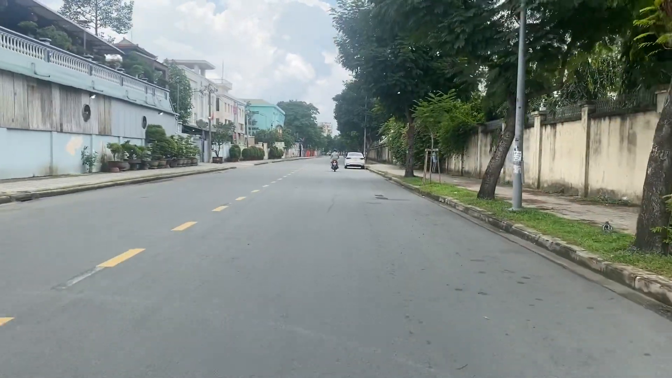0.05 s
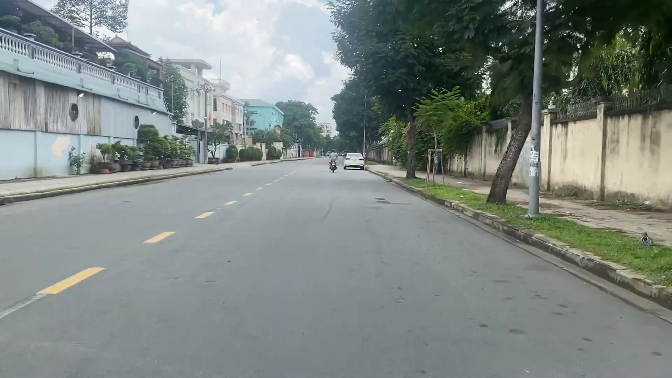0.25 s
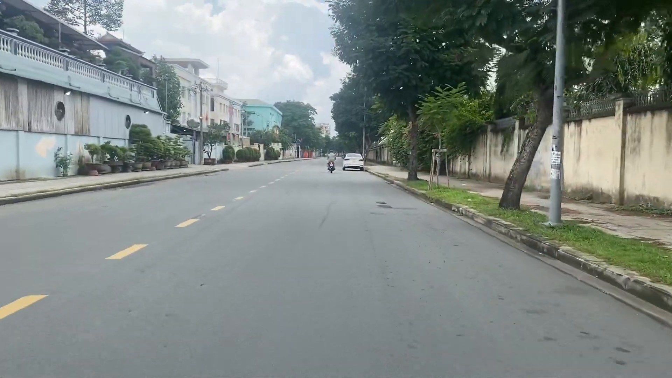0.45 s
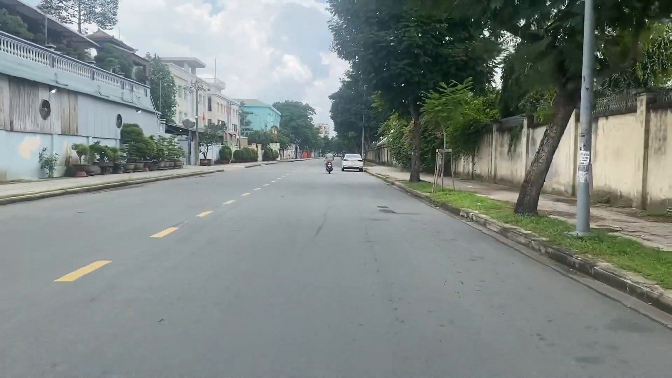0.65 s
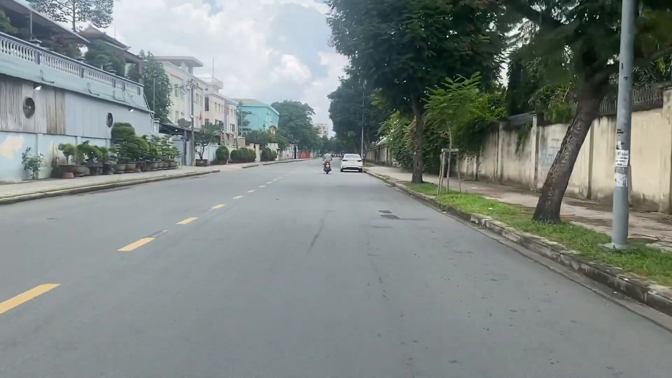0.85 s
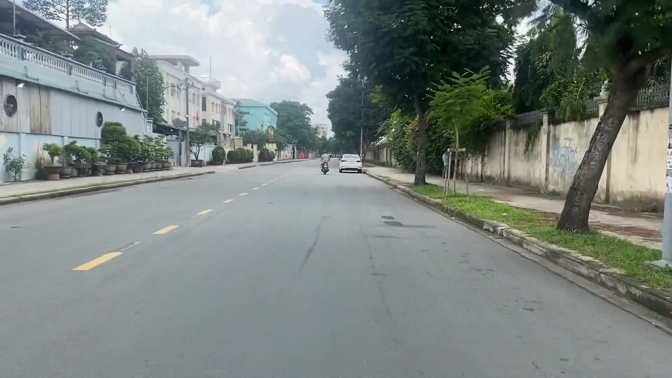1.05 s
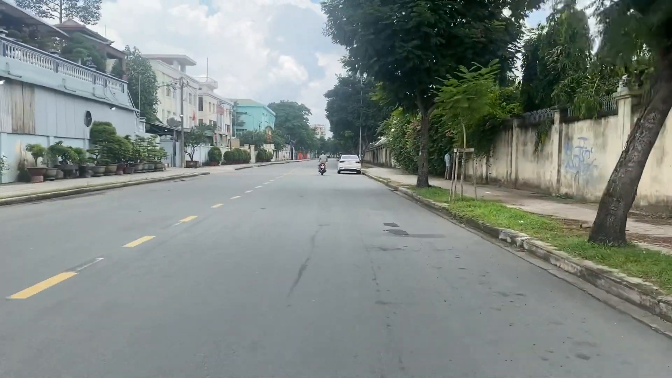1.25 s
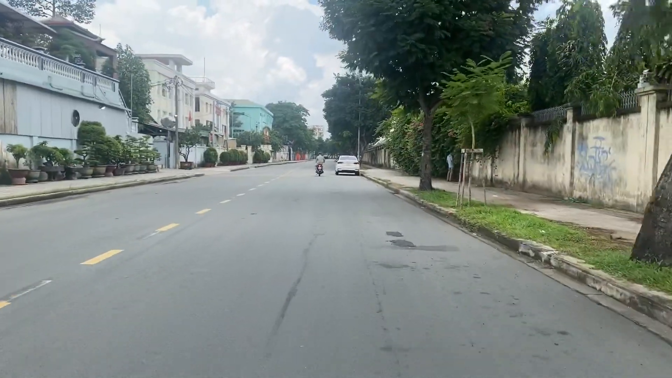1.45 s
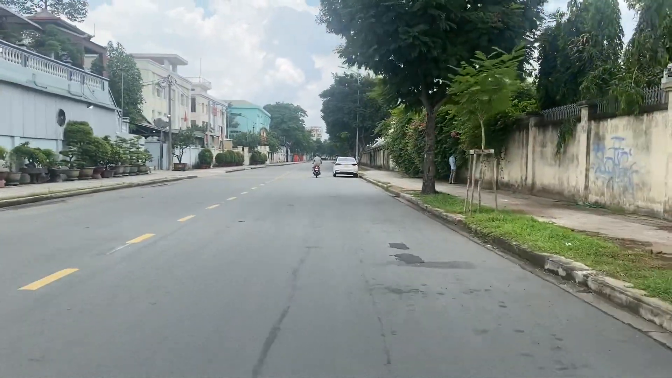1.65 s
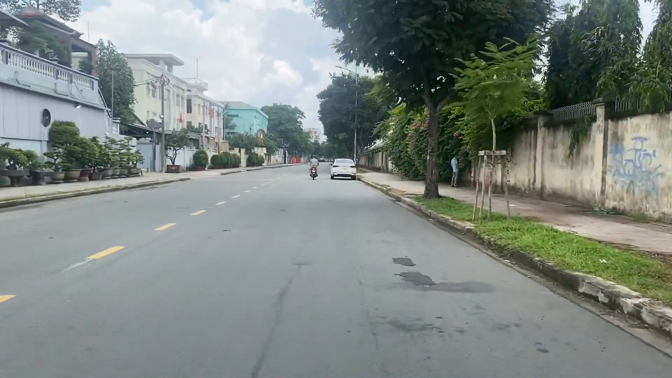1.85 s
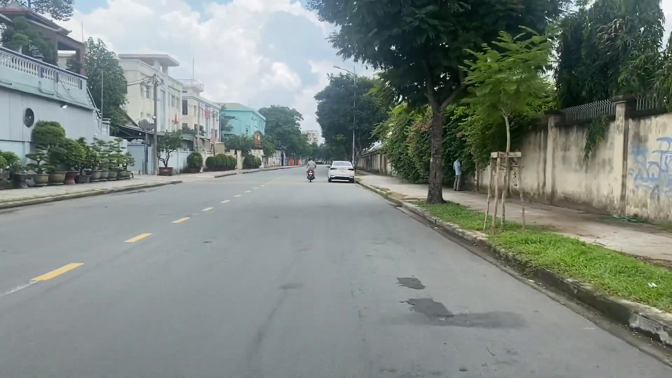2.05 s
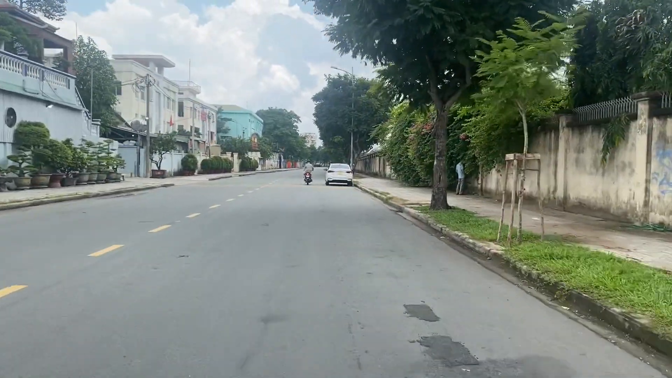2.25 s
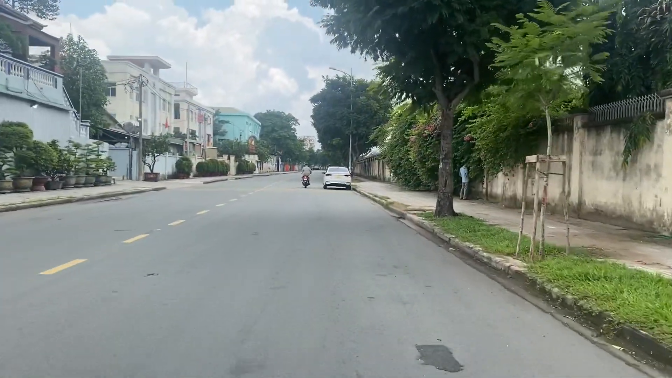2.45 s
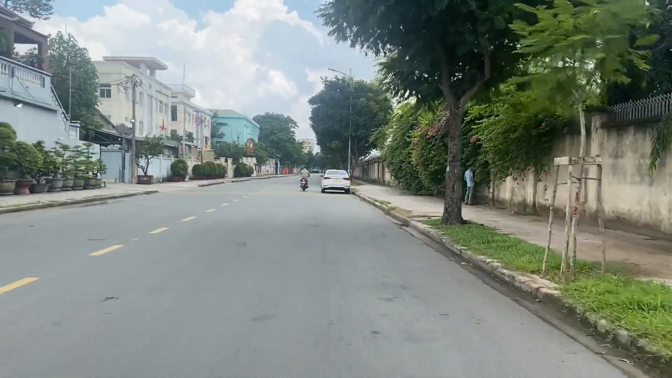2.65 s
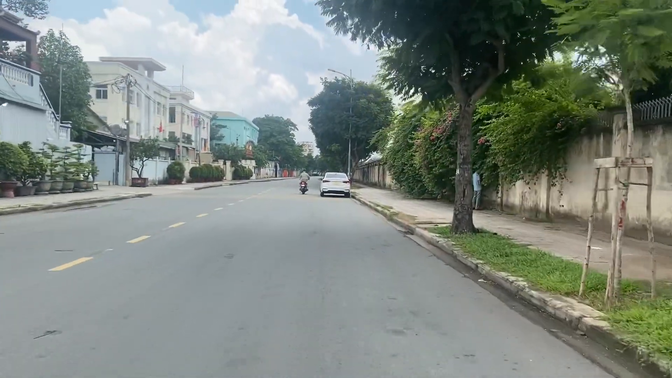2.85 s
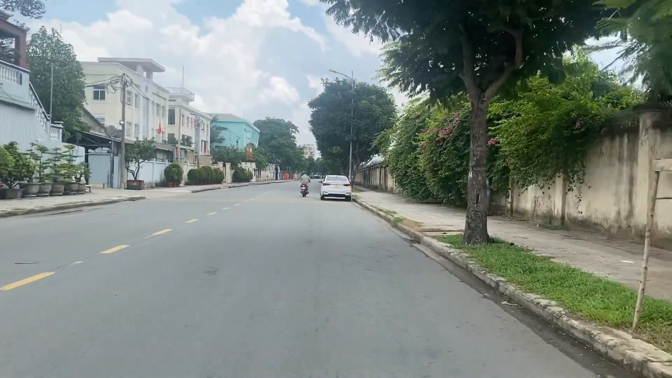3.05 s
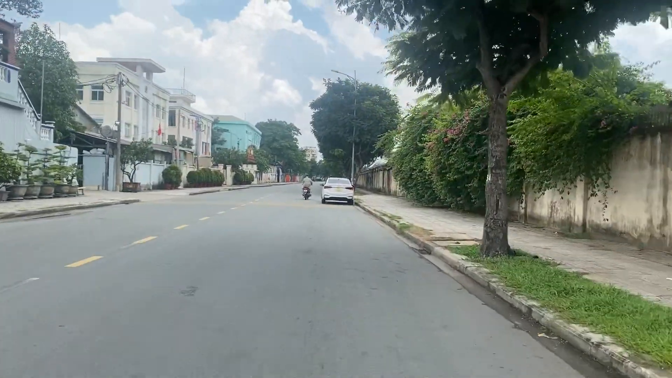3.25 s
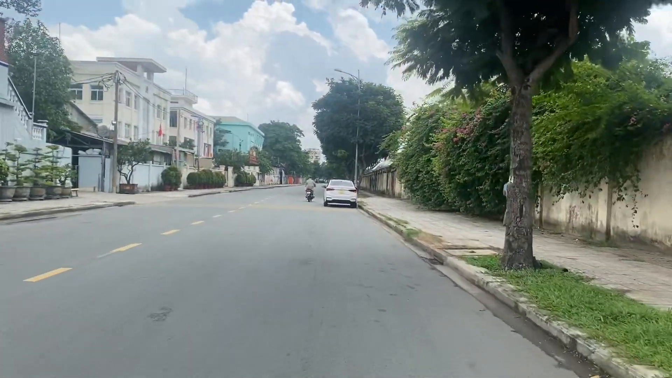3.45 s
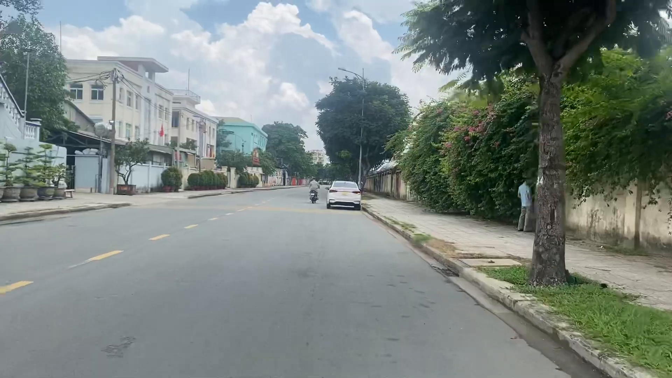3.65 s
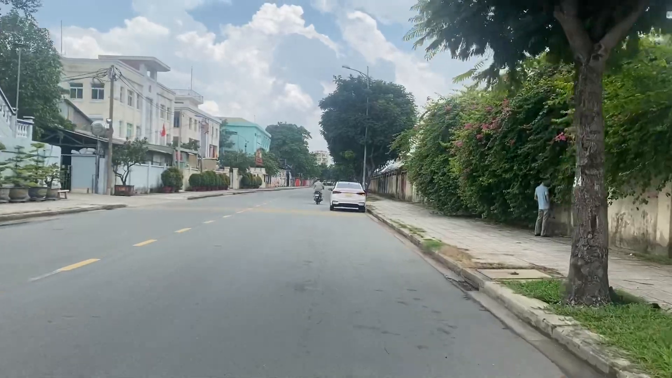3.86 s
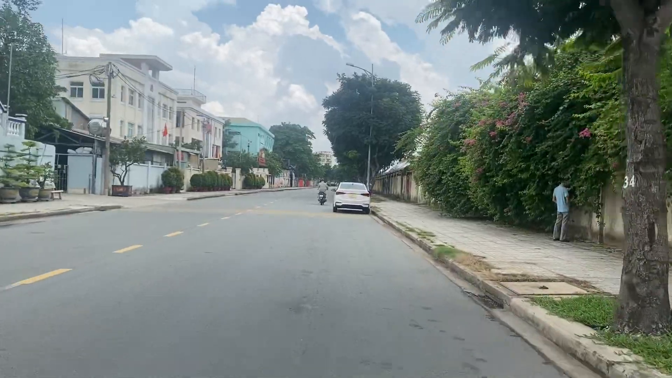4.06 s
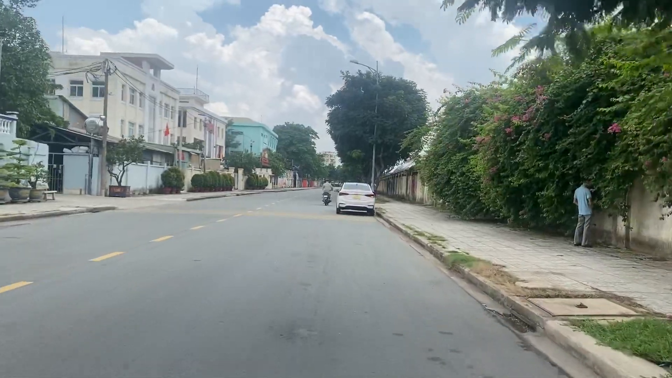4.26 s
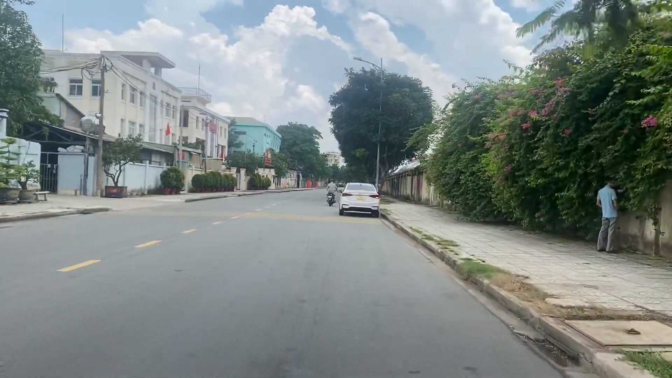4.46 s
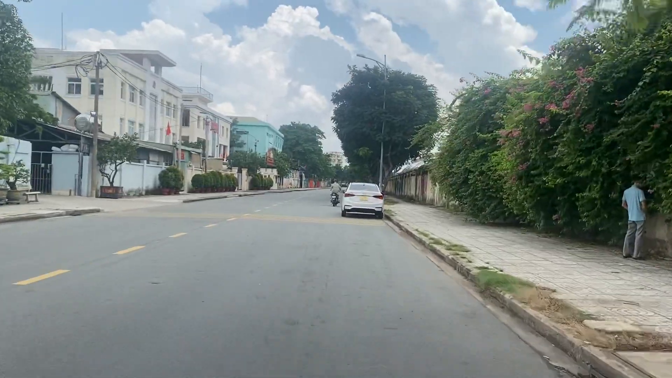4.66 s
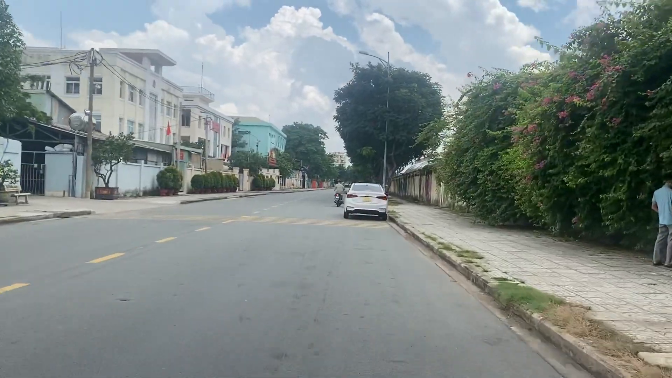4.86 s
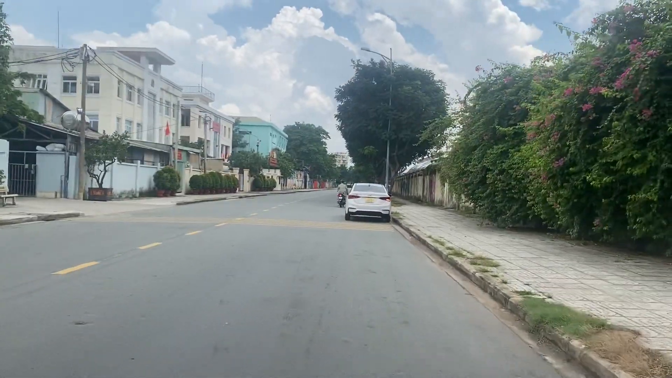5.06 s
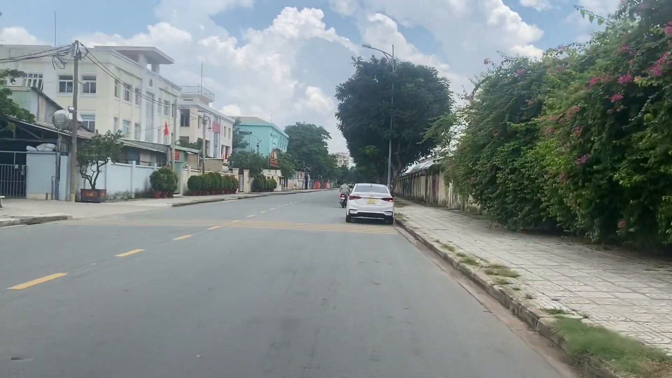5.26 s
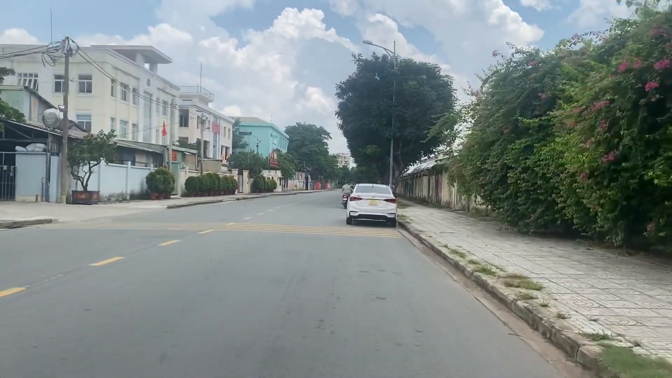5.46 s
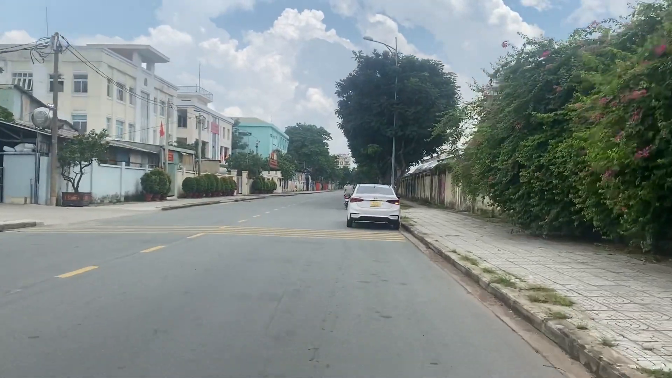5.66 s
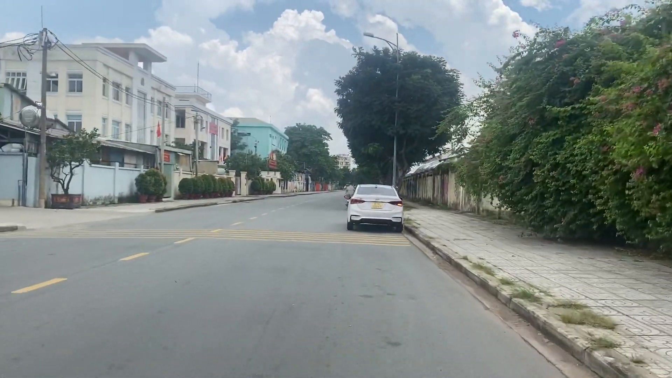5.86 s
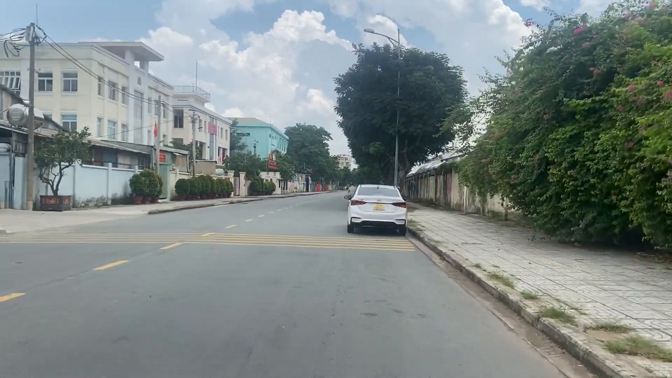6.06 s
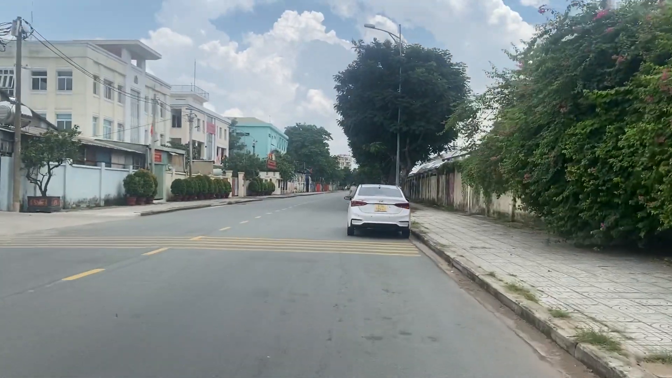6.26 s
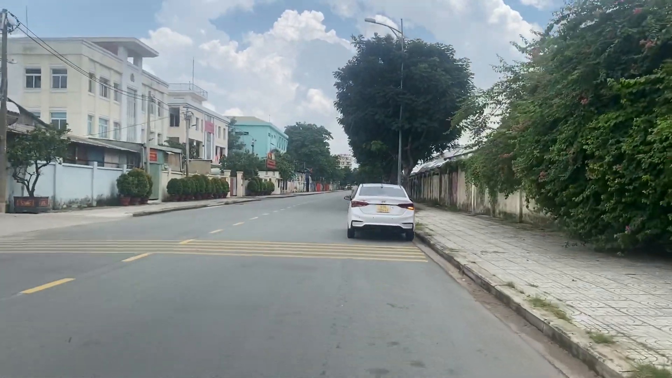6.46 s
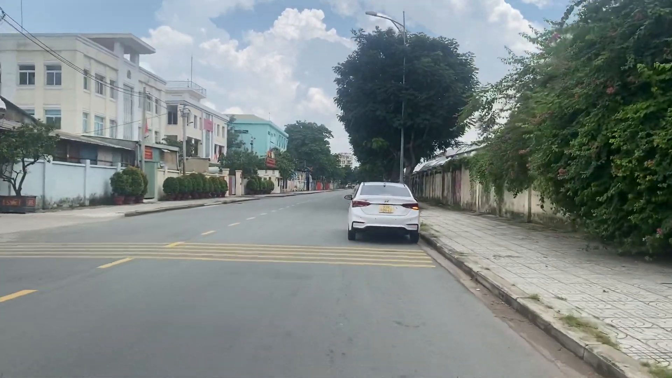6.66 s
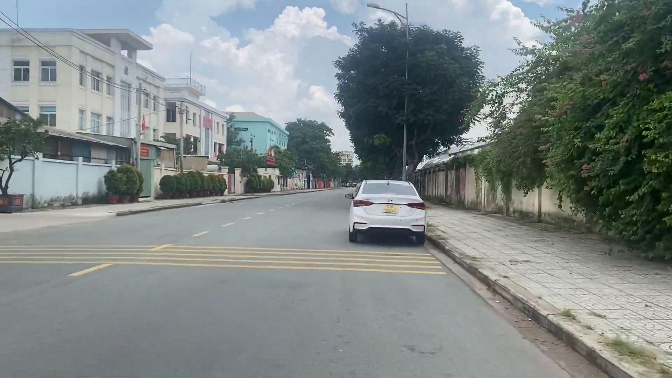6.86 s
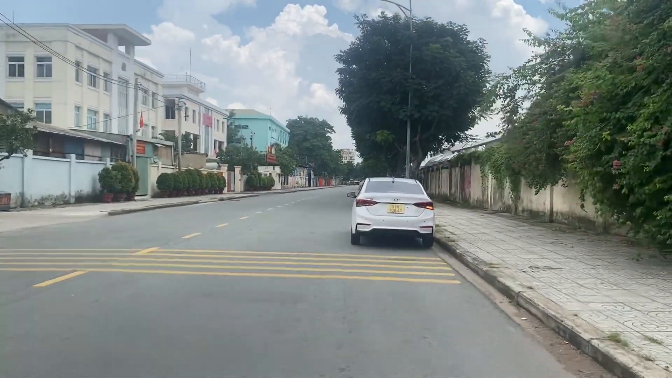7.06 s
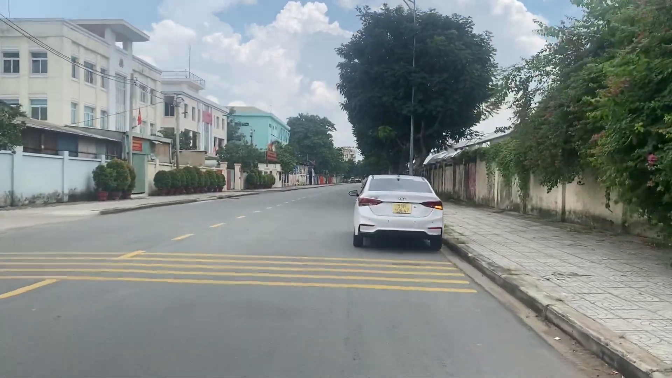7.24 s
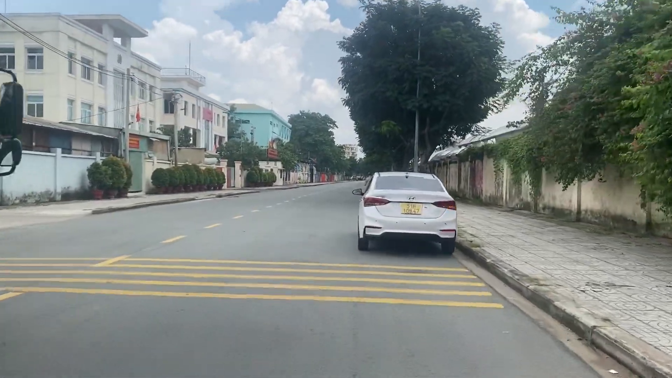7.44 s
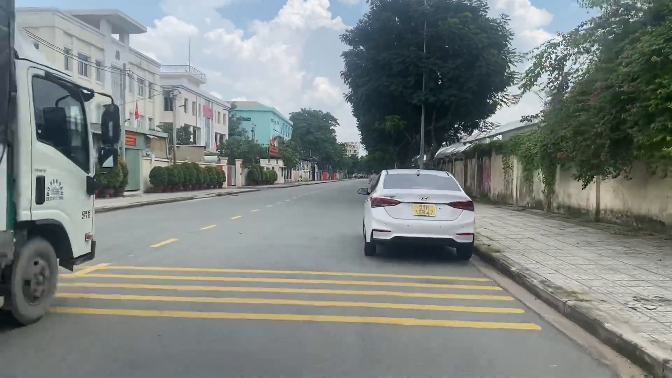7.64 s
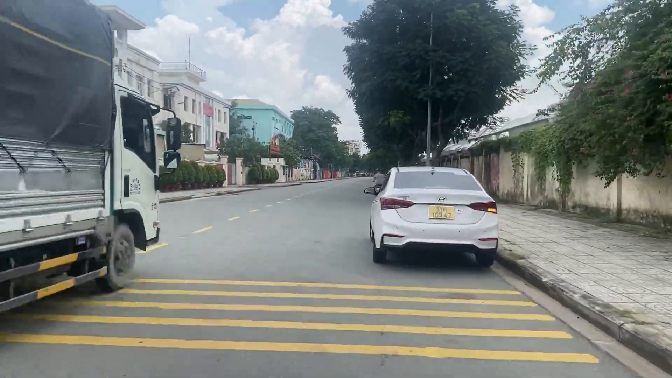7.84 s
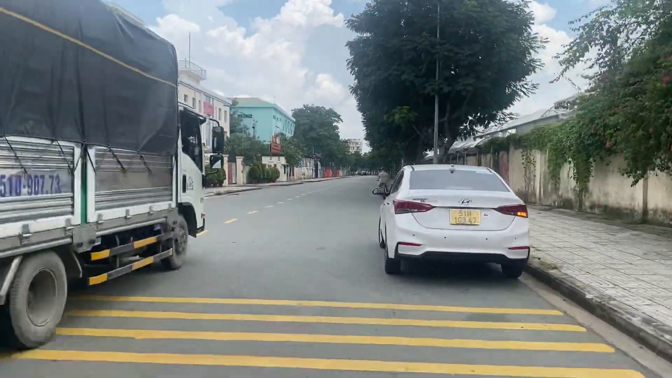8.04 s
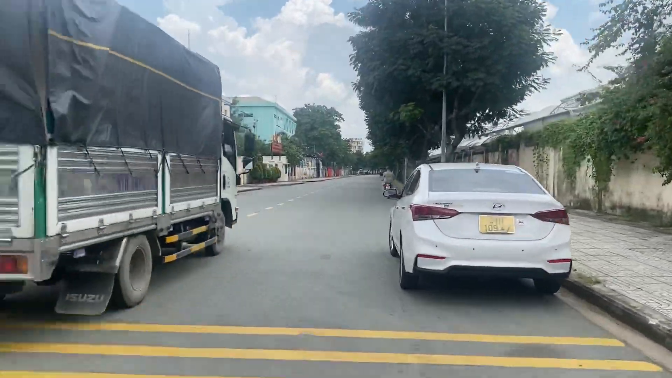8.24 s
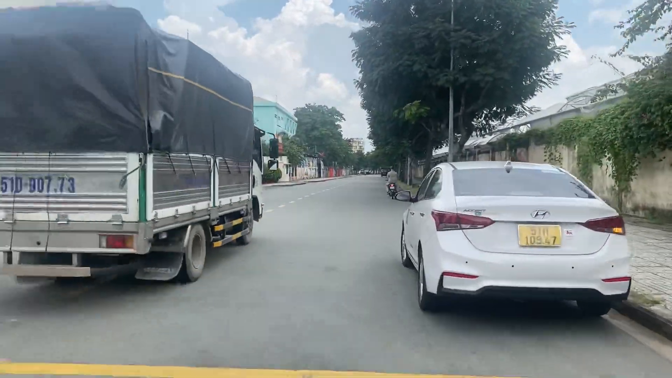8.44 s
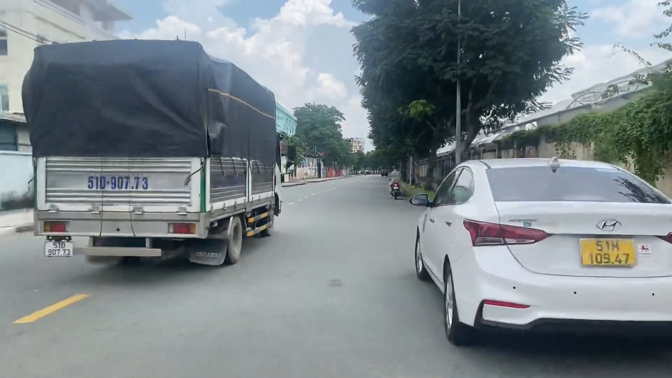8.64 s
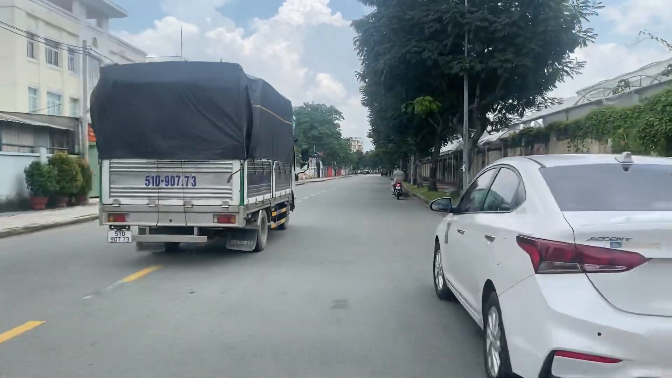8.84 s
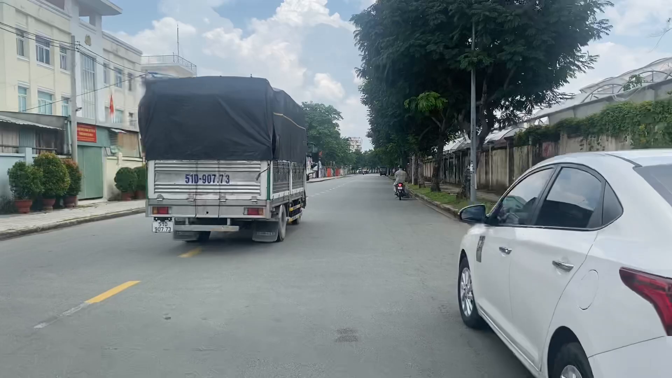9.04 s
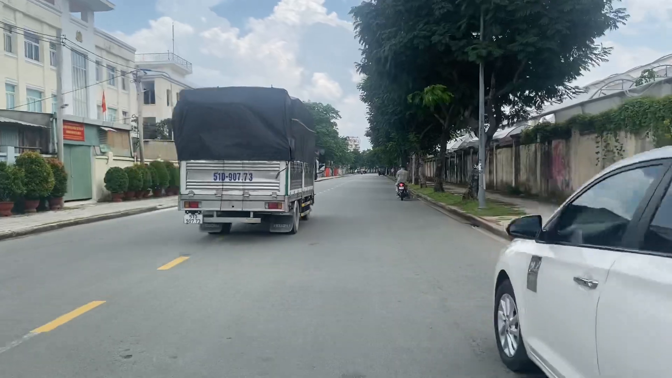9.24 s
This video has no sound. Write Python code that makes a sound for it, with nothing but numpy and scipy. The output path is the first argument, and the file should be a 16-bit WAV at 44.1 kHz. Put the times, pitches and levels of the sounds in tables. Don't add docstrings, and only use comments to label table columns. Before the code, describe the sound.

On a slow scooter along a quiet street, steady tyre roar and a small uneven engine run beneath wind bumping straight on the microphone. Faint panel ticks come and go. Midway a diesel hum grows, then a truck hisses and roars past on the left, loudest after seven seconds, and recedes ahead amid heavy wind slaps.

```python
import sys
import numpy as np
from scipy import signal
from scipy.fft import rfft, irfft, next_fast_len
from scipy.io import wavfile
from scipy.ndimage import uniform_filter1d

SR = 44100
rng = np.random.default_rng(int(sys.argv[2]) if len(sys.argv) > 2 else 0)


def wav_record(signal):
    frames = np.transpose(np.atleast_2d(signal))
    bounded = np.clip(frames, -1, 1)
    quanta = np.round(bounded * 32767).astype(np.int16)
    wavfile.write(sys.argv[1], SR, quanta)


def linear_from_db(decibels):
    return 10 ** (np.asarray(decibels, float) / 20)


N = 410123
TIME = np.arange(N) / SR

# (frequency [Hz], likeness [0-1], lead of left [rad])
STREET_PAIR = [(60, 0.17, 0.8), (345, 0.7, -0.46), (780, 0.22, 3), (2470, 0, -1.5), (4400, 0.9, -1),
               (5000, 0.44, -2), (6100, 0.53, -1.5), (7360, 0.14, 5)]
# (frequency [Hz], likeness [0-1], lead of left [rad])
TREBLE_PAIR = [(8100, .6, 2.3), (8350, .89, 3.14), (8900, .92, 3.14), (9450, .86, 3.14), (9900, .6, 4.7),
               (10450, 1, 6.28), (11700, 1, 6.28), (12200, .7, 7.4), (12800, .99, 9.42), (13600, 1, 9.42),
               (14200, .97, 9.42), (14700, .4, 11), (15100, 1, 12.57)]
# (time [s], strength [dB])
HEADWIND = [(0, -30.5), (.9, -39), (1.6, -34), (2.4, -38), (3.3, -39), (4.1, -36), (4.9, -41), (5.6, -34),
            (6.2, -31), (6.7, -34), (7.0, -34.5), (7.6, -29), (8.1, -27.5), (8.45, -38), (8.9, -30.5),
            (9.3, -41)]


def rms_one(x):
    return x / np.sqrt(np.mean(x ** 2) + 1e-20)


def in_time(rows):
    s, *columns = np.transpose(rows)
    return [np.interp(TIME, s, column) for column in columns]


def at_hz(points, hz, column=1):
    points = np.array(points)
    return np.interp(np.log(hz), np.log(points[:, 0]), points[:, column])


def bump(centre_s, span_s):
    return np.exp(-((TIME - centre_s) / span_s) ** 2)


def left_over_right(db):
    return linear_from_db(db * np.array([[.5], [-.5]]))


def butter(x, order, hz, kind="low"):
    return signal.sosfilt(signal.butter(order, hz, kind, fs=SR, output="sos"), x)


def drift(rate, step=40):
    r = np.exp(-2 * np.pi * step * rate / SR)
    noise = rng.standard_normal(N // step + 2002)
    return rms_one(signal.lfilter([1], [1, -2 * r, r * r], noise)[2000:])


def filled(slow, step=40):
    return np.interp(np.arange(N) / step, np.arange(len(slow)), slow)


def resonate(x, modes, alternate=-1):
    out = 0
    for k, (hz, width, level_db) in enumerate(modes):
        r = np.exp(-np.pi * width / SR)
        poles = [1, -2 * r * np.cos(2 * np.pi * hz / SR), r * r]
        ringing = signal.lfilter([(1 - r * r) / 2, 0, (r * r - 1) / 2], poles, x)
        out = out + alternate ** k * linear_from_db(level_db) * ringing
    return out


def two_mics(left, other, pair, colour=None):
    size = next_fast_len(N)
    hz = np.maximum(np.arange(size // 2 + 1) * SR / size, 1)
    alike = np.clip(at_hz(pair, hz), 0, 1)
    shift = np.exp(-1j * at_hz(pair, hz, column=2))
    left, other = rfft(left, size), rfft(other, size)
    right = alike * left * shift + np.sqrt(1 - alike ** 2) * other
    gain = 1 if colour is None else linear_from_db(at_hz(colour, hz))
    return irfft(np.array([left, right]) * gain, size)[:, :N]


def roar(colour, pair, patchy_db, treble_db, bass_db, start=0):
    noise = []
    for _ in range(2):
        noise.append(two_mics(*rng.standard_normal((2, N)), pair + TREBLE_PAIR, colour)[:, start:])
    out, together = np.zeros((2, N)), drift(3.0)
    edges = 22 * 2 ** np.arange(0, 10, .625)
    for k, (low, high) in enumerate(zip(edges, np.append(edges[1:], .45 * SR))):
        band = butter(noise[k % 2], 2, [low, high], "band")
        flicker = filled(linear_from_db(patchy_db * (.35 * together + drift(14))))
        if low > 5000:
            flicker = flicker * linear_from_db(treble_db)
        if low < 800:
            flicker = flicker * linear_from_db(bass_db)
        out[:, start:] += band * flicker[start:]
    return out / np.sqrt(np.mean(noise[0] ** 2))


def street():
    # (time [s], level [dB])
    loudness = [(0, -33), (1.2, -32), (2.4, -32), (3.4, -29.5), (4.5, -30), (6.0, -29), (9.3, -30.5)]
    # (frequency [Hz], level [dB per Hz])
    colour = [(25, -9), (90, 3), (200, -11.5), (480, -8), (850, -14), (1250, -13.5), (1850, -22.5),
              (3000, -24), (3700, -28.5), (4350, -29), (5000, -31.5), (6000, -31.5), (7200, -36.5),
              (11000, -47), (15500, -53.5)]
    level_db, = in_time(loudness)
    return linear_from_db(level_db) * roar(colour, STREET_PAIR, patchy_db=1.28, treble_db=-0.5, bass_db=-1.5)


def rattles():
    # (time [s], peak level [dB])
    knocks = [(1.6706, -55), (1.7828, -48), (2.3974, -47), (2.5167, -48), (2.9186, -58), (2.9517, -53),
              (3.896, -52), (4.3225, -50), (4.8559, -48), (5.0225, -48), (5.3527, -42), (5.685, -55),
              (5.7189, -42), (6.105, -54), (6.5153, -57), (6.6932, -57)]
    kicks = np.zeros(N)
    for s, peak_db in knocks:
        kicks[round(s * SR)] = linear_from_db(peak_db + 18.0)
    fading = signal.lfilter([1], [1, -np.exp(-1 / (0.0091 * SR))], kicks + 1e-18)
    bursts = fading * rng.standard_normal((2, N))
    bright = resonate(bursts, [(6000, 4800, -2.5), (10200, 5800, -3.0)]) * linear_from_db(-10.0)
    return two_mics(*bright, STREET_PAIR + TREBLE_PAIR)


def scooter():
    # (time [s], firing rate [per s], throttle [dB])
    engine = [
        (0, 29, 4),
        (1.3, 33.5, 5.5),
        (1.8, 28.4, 6),
        (1.95, 26, -3),
        (2.1, 24, 0),
        (2.3, 34.8, 3),
        (4.0, 23.9, -11),
        (6.0, 26, -8),
        (9.3, 23.6, -12),
    ]
    # (frequency [Hz], width [Hz], level [dB])
    exhaust_modes = [(57.4, 42, 12), (99, 27, 4), (417, 31, -11), (1200, 870, -11.5)]
    # (frequency [Hz], width [Hz], level [dB])
    whine_modes = [(1080, 60, 8), (1390, 80, 6), (2070, 40, -1)]
    # (frequency [Hz], width [Hz], level [dB])
    gear_modes = [(4190, 120, -11), (2050, 70, -6)]
    per_s, throttle_db = in_time(engine)
    cycle = np.cumsum(per_s * (1 + 0.022 * filled(drift(6.0)))) / SR
    pulses = np.diff(np.floor(cycle), prepend=0) * linear_from_db(0.72 * rng.standard_normal(N))
    exhaust = linear_from_db(-37 + .1 * throttle_db) * rms_one(resonate(pulses + 1e-18, exhaust_modes))
    puffs = (0.6 + np.exp(-4.0 * (cycle % 1))) * rng.standard_normal((2, N))
    whine_lift = linear_from_db(10 * bump(1.97, .2))
    whine = whine_lift * resonate(rng.standard_normal((2, N)) * 1.24, gear_modes)
    ticks = linear_from_db(-46.5 + throttle_db) * rms_one(resonate(puffs, whine_modes) + whine)
    return two_mics(exhaust + ticks[0], ticks[1], STREET_PAIR + TREBLE_PAIR)


def gusting():
    # (time of the top [s], half length [s], strength [dB], flutter against buffet [dB])
    gusts = [(0.029, 0.11, -23.5, 2), (0.262, 0.017, -27, 4), (0.432, 0.032, -24.5, 0),
             (0.534, 0.031, -18, -22), (0.764, 0.035, -30.5, -6), (1.107, 0.12, -33, 2.5),
             (1.418, 0.025, -22.5, -9), (1.493, 0.02, -30, 3), (2.096, 0.11, -30, -0.5),
             (2.416, 0.023, -42, -6), (2.605, .06, -26, -13), (3.107, 0.16, -29.5, -2.5),
             (3.465, 0.3, -39.5, 6), (3.714, 0.028, -23.5, 5), (4.426, 0.061, -29.5, 0),
             (4.745, 0.026, -30.5, 8.5), (5.172, 0.041, -27, -5), (5.326, 0.096, -25.5, -14),
             (5.562, 0.03, -22, -11), (5.744, 0.13, -28.5, 0), (6.045, 0.047, -31, 7),
             (6.319, 0.04, -28, 1), (6.514, 0.021, -20, -6), (7.15, 0.042, -20.5, -1.5),
             (7.652, 0.25, -49, 6), (8.213, 0.027, -21, -11), (8.373, 0.035, -21, -1),
             (8.512, 0.036, -19.5, -5), (8.744, 0.11, -20.5, -12), (9.187, 0.023, -23, -18)]
    t = np.arange(N // 40 + 2) * 40 / SR
    buffet = linear_from_db(np.interp(t, *np.transpose(HEADWIND))) ** 2
    flutter = buffet * linear_from_db(-0.5) ** 2
    for s, half, level_db, flutter_db in gusts:
        span = half * np.where(t < s, 0.82, 1)
        swell = linear_from_db(level_db) ** 2 * np.exp(-2 * ((t - s) / span) ** 2)
        buffet = buffet + swell
        flutter = flutter + swell * linear_from_db(flutter_db) ** 2
    return filled(np.sqrt(buffet)), filled(np.sqrt(flutter))


def small_eddies():
    count = 90
    slot, size = rng.random((count, 2)).T
    s = (np.arange(count) + slot) * N / SR / count
    peak_db = np.interp(s, *np.transpose(HEADWIND)) + 6 + 3.0 * (2 * size - 1)
    return list(zip(s, peak_db, 0 * s))


def eddies():
    # (time [s], peak level [dB], crack against swing [dB])
    headwind_eddies = [(0.01, -16, 11), (0.025, -13, 2.5), (0.046, -6, 10), (0.095, -9, 6.5),
                       (0.133, -25, -6), (0.197, -19, -2), (0.248, -24, 0.0), (0.258, -10.5, 3),
                       (0.343, -36, 0.0), (0.405, -27, -5), (0.428, -20, 7), (0.437, -34, 4),
                       (0.495, -23, 4), (0.514, -14.5, 6), (1.084, -29, -2), (1.175, -30, 0),
                       (1.386, -27, -4), (1.408, -27, -7), (1.778, -23, -6), (1.885, -23, -2),
                       (2.013, -23, -1.5), (2.093, -25, 1), (2.305, -23.5, -1), (2.407, -22.5, -6),
                       (2.673, -19, 6), (2.903, -27, -5.5), (3.261, -27, -4.5), (3.361, -31, 3),
                       (3.524, -26, -4), (3.699, -30, 0.0), (3.722, -30, 1), (3.742, -26, 3),
                       (3.773, -27, 0), (4.509, -23, -1), (4.532, -23.5, -1), (4.594, -25.5, -11.5),
                       (4.698, -26.5, -12), (4.725, -15, -2), (4.733, -28, 3), (4.751, -21, -11),
                       (4.758, -15, -2), (4.797, -22, 6), (4.818, -24, 3), (5.058, -22, -5.5),
                       (5.36, -21, 10), (5.396, -25, -4), (5.509, -29, -8), (5.622, -35, 2),
                       (5.648, -27, 1), (5.712, -23, -3), (5.739, -33, 3), (5.76, -33, 5), (5.781, -19, -4),
                       (5.88, -21, -7), (5.893, -25, -6), (5.941, -30, 5), (6.005, -22.5, -3),
                       (6.057, -26, 4), (6.106, -29, -5)]
    # (time [s], peak level [dB], crack against swing [dB])
    wake_eddies = [(6.199, -25, -8), (6.237, -4, 3.5), (6.258, -15, 3), (6.275, -17, 6), (6.284, -8, 1),
                   (6.29, -15, 2), (6.297, -8, 1), (6.308, -9, 10), (6.315, -10, 6), (6.327, -5, 8),
                   (6.338, -8.5, 24), (6.364, -21, 0.0), (6.394, -27, 0.0), (6.421, -21.5, -8),
                   (6.462, -26, -4), (6.506, -21, -5), (6.631, -26, -2), (6.715, -20.5, -3.5),
                   (7.02, -13, 9), (7.091, -13, 1), (7.191, -16, -2), (7.264, -28, 3), (7.569, -18, -4),
                   (7.631, -8, 3), (7.77, -11, -1), (7.805, -15, -10), (7.818, -16.5, -8), (7.844, -10, -3),
                   (7.93, -13, 0), (8.059, -16, -5), (8.091, -4, 3), (8.098, 0, 11), (8.117, -0.5, 13),
                   (8.128, -2, 5), (8.158, -15, -5), (8.197, -20.5, -4), (8.214, -19.5, -7),
                   (8.378, -24, 7), (8.511, -26, 6), (8.543, -17, 6), (8.584, -18, -4.5),
                   (8.643, -14.5, -5), (8.664, -15, -7), (8.687, -12.5, 3), (8.724, -7.5, 2.5),
                   (8.782, -12, 5), (8.907, -14, 13), (8.953, -16, 4), (9.025, -20.5, -5), (9.08, -9.5, 6),
                   (9.125, -24, -6), (9.145, -9.5, 2), (9.167, -10.5, 2.5), (9.222, -17.5, 2),
                   (9.272, -33, 0.0)]
    soft_db, sharp_db = -22, -6
    rows = list(headwind_eddies) + list(wake_eddies) + small_eddies()
    out, t = np.zeros(N + 2500), np.arange(2500) / SR
    chance, white = rng.random((len(rows), 3)), rng.standard_normal((len(rows), len(t)))
    bright = rms_one(butter(white, 2, [520, 1750], "band"))
    soft = rms_one(butter(white, 2, [380, 1000], "band"))
    sharpness = np.clip((np.array(rows)[:, 1:2] - soft_db) / (sharp_db - soft_db), 0, 1)
    bright = sharpness * bright + (1 - sharpness) * soft
    dull = rms_one(butter(white[:, ::-1], 1, [150, 550], "band"))
    for (s, peak_db, crack_db), (phase, fall, size), high, low in zip(rows, chance, bright, dull):
        life = 0.005 * (1 + 0.36 * (2 * size - 1))
        pitch = 120 + 500 * np.exp(-t / (life * (0.22 + 0.35 * fall)))
        swing = 0.49 * np.sin(2 * np.pi * (np.cumsum(pitch) / SR + phase)) * np.exp(-t / (1.06 * life))
        swing = swing + 0.6 * low * np.exp(-t / (1.69 * life))
        swing = swing * (1 - np.exp(-t / 0.0034))
        crack = high * np.exp(-(t / (.9 * life)) ** 2)
        rise = 1 - np.exp(-t / 0.00081)
        crack = crack / np.max(np.abs(rise * crack))
        shape = rise * (crack + linear_from_db(-crack_db) * swing / np.max(np.abs(swing)))
        at = round(s * SR)
        out[at:at + len(t)] += linear_from_db(peak_db + 2.5 - 2.5) * shape
    return out[:N]


def thuds():
    # (time [s], peak level [dB])
    hits = [(.286, -20), (1.408, -16), (2.407, -21), (2.673, -24), (2.904, -26), (4.818, -25), (6.339, -9),
            (6.717, -25), (7.802, -14), (8.161, -14), (8.512, -14), (8.724, -10), (8.953, -20)]
    out, t = np.zeros(N + 2500), np.arange(2500) / SR
    pitch = 95 + 520 * np.exp(-t / .003)
    fade = (1 - np.exp(-t / .001)) * np.exp(-t / .009)
    shape = fade * np.sin(2 * np.pi * np.cumsum(pitch) / SR)
    for s, peak_db in hits:
        at = round(s * SR)
        out[at:at + len(t)] += linear_from_db(peak_db) * shape / np.max(np.abs(shape))
    return out[:N]


def wind():
    # (frequency [Hz], level [dB per Hz])
    buffet_colour = [(20, -32), (40, 13), (65, 17.5), (110, 14), (180, 4), (300, -4.5), (1200, -100)]
    # (frequency [Hz], level [dB per Hz])
    flutter_colour = [(60, -16), (150, -5), (300, -5), (550, -7.5), (900, -19), (1400, -18), (2200, -59),
                      (5000, -100)]
    # (frequency [Hz], likeness [0-1], lead of left [rad])
    wind_pair = [(40, 0.52, 0.8), (193, 0.98, 0.75), (455, 1, 0.86), (1070, 0.99, 1.83), (2070, 0.41, 3.5)]
    # (frequency [Hz], level [dB])
    port = [(30, -8), (80, 4.5), (1300, -1), (2000, -8), (2700, -22), (4500, -90)]
    buffet_gain, flutter_gain = gusting()
    lumps = filled(linear_from_db(2.0 * drift(15.0)))
    buffet = rms_one(two_mics(*rng.standard_normal((2, N)), wind_pair, buffet_colour)) * lumps
    clumps = filled(linear_from_db(4.4 * np.tanh(drift(54.0))))
    flutter = rms_one(two_mics(*rng.standard_normal((2, N)), wind_pair, flutter_colour) * clumps)
    single = eddies() + thuds()
    slaps = two_mics(single, np.roll(single, 90), wind_pair, port) * left_over_right(-1.2)
    slaps[0] -= .5 * butter(slaps[0], 1, 1200, "high")
    return linear_from_db(-0.5) * buffet_gain * buffet + linear_from_db(-1.5) * flutter_gain * flutter + slaps


def fan():
    # (frequency [Hz], width [Hz], level [dB])
    front_modes = [(1920, 110, 10), (2340, 200, 2), (2740, 370, -3), (4540, 1400, -2), (6100, 1650, -4.5)]
    faces_s, span_s = 6.6, 0.58
    hiss = rms_one(resonate(rng.standard_normal((2, N)), front_modes))
    hiss = hiss + 0.22 * hiss[::-1]
    echo_ms = np.clip(0.9 + 0.32 * (TIME - faces_s), .1, 3)
    late = np.arange(N) - echo_ms * SR / 1000
    hiss = hiss + .18 * np.array([np.interp(late, np.arange(N), side) for side in hiss])
    level = linear_from_db(-38.5 + 2.0 * filled(drift(8.0))) * bump(faces_s, span_s)
    return level * hiss * left_over_right(2.5)


def truck():
    # (time [s], roar level [dB])
    nearness = [(4.3, -54), (5.5, -44.5), (6.05, -44.5), (6.3, -39.5), (6.6, -39.5), (6.9, -36), (7.1, -34),
                (7.3, -30), (7.6, -30.5), (7.85, -31), (8.05, -33), (8.3, -35.5), (9.3, -41)]
    # (frequency [Hz], level [dB per Hz])
    colour = [(60, 0), (150, -5), (420, -5), (1050, -10.5), (1800, -12), (2500, -18), (3600, -25.5),
              (4700, -29), (7000, -35), (9500, -26), (12000, -36), (15500, -41)]
    # (frequency [Hz], likeness [0-1], lead of left [rad])
    truck_pair = [(60, 0.41, 1), (390, 0.85, 0.1), (1130, 0.09, 1.6), (1890, 0.84, -1.8),
                  (2780, 0.85, -0.8), (4560, 0.24, -1.5), (5600, 0.25, -1.5), (7200, 0.98, -2),
                  (7400, 0.98, 1)]
    # (time [s], firing rate [Hz], hum level [dB])
    engine = [(4.0, 58.6, -38), (4.9, 58.5, -32), (5.8, 59, -30.5), (6.2, 59.2, -34), (6.65, 59.9, -26.5),
              (7.15, 59.9, -22.5), (7.55, 59.9, -23), (7.8, 60.2, -29), (8.35, 60.2, -33), (9.3, 57.0, -36)]
    # (frequency [Hz], width [Hz], level [dB], time nearest [s])
    body = [(388, 110, -7.5, 7.5), (780, 170, 4.5, 7.31), (557, 140, -8, 7.5), (1398, 115, 0.5, 8.05),
            (2220, 180, -4, 7.4), (2730, 290, -6, 6.8), (3057, 130, 3.5, 7.2), (3760, 240, -6, 7.4),
            (4270, 140, 5, 7.07), (4670, 170, -3.5, 7.95), (5100, 330, 2, 7.5), (5690, 570, 11, 7.33)]
    # (frequency [Hz], width [Hz], level [dB])
    box = [(406, 105, 0.5), (720, 200, -14)]
    # (frequency [Hz], width [Hz], level [dB])
    tail_end = [(1440, 99, -7), (2460, 210, 2.5), (3800, 490, -4)]
    roar_db, = in_time(nearness)
    firing_hz, hum_db = in_time(engine)

    abreast = bump(7.53, 0.56)
    ahead = .5 + .5 * np.tanh((TIME - 8) / 0.084)
    wheels_s = 7.3
    wheels = bump(wheels_s, np.where(TIME < wheels_s, 0.083, 0.62))
    treble_db = -26 * (1 - ahead) - 25 * ahead + 5.5 * abreast + 1 * wheels
    noise = roar(colour, truck_pair, 1.2, treble_db + 19, bass_db=-0.94, start=4 * SR)

    parts = 0
    for *mode, s in body:
        parts = parts + linear_from_db(6 * bump(s, 0.36) - 5.0) * resonate(noise, [mode])
    noise = noise + parts - 0.23 * abreast * resonate(noise, [(1120, 260, 0)])
    noise = noise - 0.24 * ahead * resonate(noise, [(1790, 300, 0)])
    noise = noise + bump(7.67, 0.21) * resonate(noise, box, alternate=0.6)
    noise = noise + ahead * resonate(noise, tail_end, alternate=0.79)

    noise = noise + resonate(noise, [(2780, 2000, 0)]) * (left_over_right(2.5) - 1)
    pan_db = 3 * (1 - ahead) - 1 * ahead
    noise = noise + butter(noise, 4, 5000) * (left_over_right(pan_db) - 1)

    turn = 2 * np.pi * np.cumsum(firing_hz * (1 + 0.006 * filled(drift(3.4)))) / SR
    throb = 1 + 0.082 * np.cos(turn) + 0.09 * np.cos(turn / 2)
    lead = np.array([[.15], [-.15]])
    hum = np.sin(turn + lead) + linear_from_db(-16) * np.sin(2 * turn + lead) + linear_from_db(-18) * np.sin(3.5 * turn)
    hum = np.sqrt(2) * linear_from_db(hum_db + 1.2 * filled(drift(5.0))) * hum
    arrive = np.clip((TIME - 4.0) / .7, 0, 1)
    return arrive * (linear_from_db(roar_db + 7) * throb * noise + hum)


def scene():
    return street() + rattles() + scooter() + wind() + fan() + truck()


def roll_off(x):
    return signal.sosfilt(signal.butter(12, 17100, fs=SR, output="sos"), x)


def record(dry):
    ceiling = .8
    cut = butter(dry, 2, 30, "high")
    bass = butter(cut, 2, 1800)
    thud_power = uniform_filter1d(np.max(bass ** 2, axis=0), size=300)
    hold = 1 / np.sqrt(1 + thud_power / .45)
    limited = ceiling * np.tanh(cut * hold / ceiling)
    top_cut = signal.ellip(10, .5, 80, 15700, fs=SR, output="sos")
    return roll_off(signal.sosfilt(top_cut, limited))


dry = scene()
out = record(dry)
wav_record(out)
```